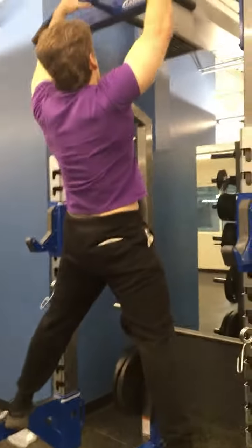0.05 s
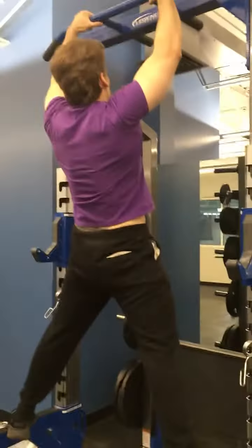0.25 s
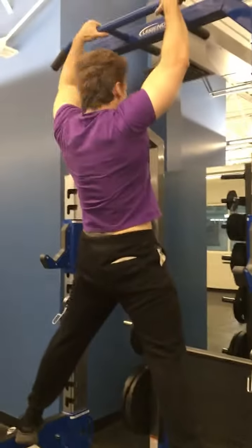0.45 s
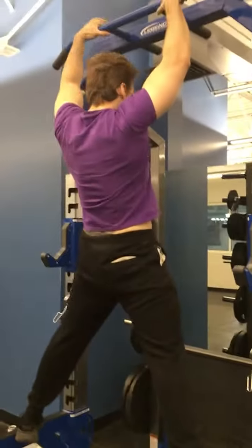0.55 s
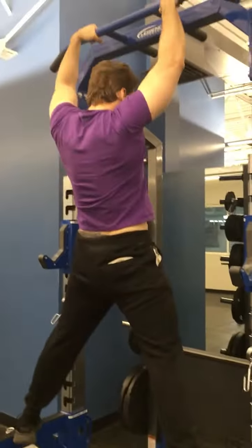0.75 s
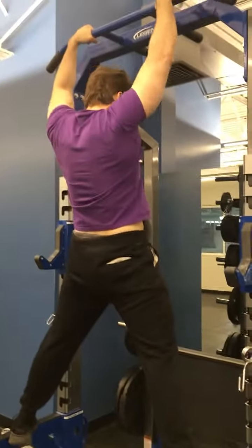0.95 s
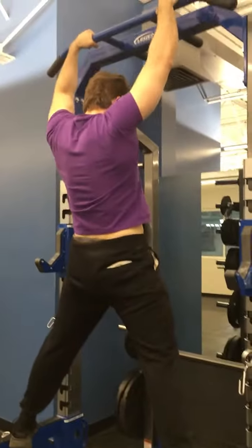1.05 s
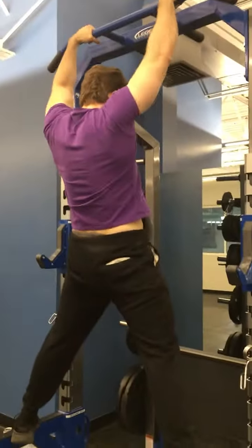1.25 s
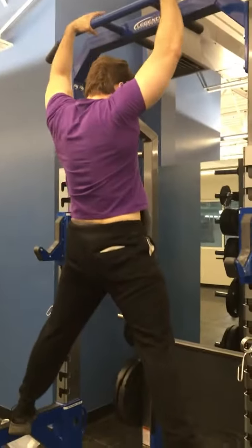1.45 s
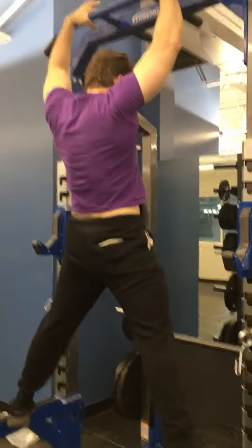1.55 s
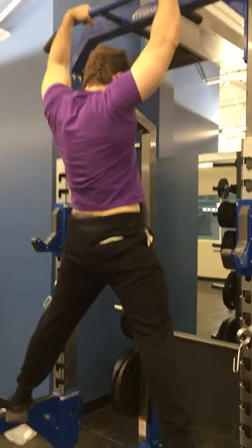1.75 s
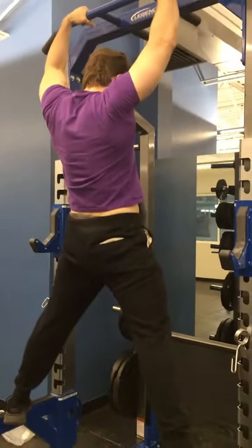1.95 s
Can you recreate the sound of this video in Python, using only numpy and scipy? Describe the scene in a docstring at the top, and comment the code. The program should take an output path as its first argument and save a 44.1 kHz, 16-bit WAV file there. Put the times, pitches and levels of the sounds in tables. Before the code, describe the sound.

Steel gym equipment lands with a loud, ringing clank, followed by light metal clicks.

```python
"""A distant clank dies away in a large, hard room, then steel gym equipment lands with a loud rattle.
The steel chatters in a burst of contacts and leaves its frame ringing; a duller knock comes from afar.
Small steel fittings tick, ting and click, followed by a soft bump and a faint ping.
The hall answers the contacts, and under it all the ventilation rumbles, hisses and hums."""
import sys
import numpy as np
from scipy import signal
from scipy.fft import rfft, irfft, next_fast_len
from scipy.io import wavfile
from scipy.ndimage import map_coordinates

SR = 44100
rng = np.random.default_rng(int(sys.argv[2]) if len(sys.argv) > 2 else 0)


def transcribe(signal):
    """Save signal, clipped to [-1, 1], as a 16-bit WAV file at the path in sys.argv[1]."""
    frames = np.atleast_2d(signal).T
    limited = np.clip(frames, -1, 1)
    pcm = np.round(limited * 32767).astype(np.int16)
    wavfile.write(sys.argv[1], SR, pcm)


N = 88200
TIME = np.arange(N) / SR

CLANK_HITS = [(0.2354, -53, 6), (.247, -19.5, -2), (0.2534, -16.5, 3.5), (0.2651, -16.5, 1.4),
              (0.2767, -25.5, -1), (.288, -20.5, 1)]  # the burst of contacts: t/s, level/dB, treble tilt/(dB per octave)
CLANK_COLOUR = [(90, -8), (150, -2), (265, -4), (460, -10.5), (680, -1.5), (780, -7), (1150, -2),
                (1300, 1.5), (1700, 6), (2000, -0.5), (2300, 0.5), (2680, -1.5), (2850, -4.5), (3300, -1),
                (3950, -7), (4620, -6.5), (4950, -9), (6400, -7.5), (7500, -10), (10500, -15),
                (12700, -10.5), (15500, -15.5)]  # tone of each contact: f/Hz, relative level/dB
FRAME_HITS = [(0.2353, -30), (0.2469, -12.5)]  # a first touch, then the full blow: t/s, level/dB
FRAME_RING = [(259.7, -14.5, 0.54), (559, -22.5, 0.58), (683, -19, 0.51), (904, -15, 0.59),
              (1164, -3, 0.46), (1416, -17.5, 0.3), (1516, -16, 0.24), (1688, 2, 0.67), (1706, -4, 0.98),
              (1780, -12, 0.81), (1895, -12.5, .7), (2220, -13, 0.83), (2626, -5, 0.43), (2723, -11, 0.56),
              (3093, -17, 0.74), (3273, -16.5, 0.72), (3397, -18, 0.86), (4580, -15.5, 0.58),
              (6360, -20, 0.52)]  # modes of the steel frame: f/Hz, relative level/dB, t60/s
def clank(settle_s=0.292, settle_over_s=0.0085, damping_db=-5):
    """Heavy steel lands, chatters for 50 ms and rings the frame, damping it as it comes to rest."""
    chatter, frame = np.zeros(N), np.zeros(N)
    for s, db, tilt_db in CLANK_HITS:
        hit = contact(CLANK_COLOUR, t60=0.17, hall_db=-6.5, build_s=0.0091, tilt_db=tilt_db)
        add(chatter, s, amp(db) * hit)
    for s, db in FRAME_HITS:
        add(frame, s, amp(db) * ring(FRAME_RING, attack_s=0.0015, flutter_depth=0.4, flutter_hz=51.2))
    settled = np.clip((TIME - settle_s) / settle_over_s, 0, 1)
    return chatter + frame * amp(damping_db * settled)


FAR_CLANK_COLOUR = [(100, -12), (300, -13), (550, -14), (900, -3), (1050, -9), (1700, 3), (2150, 2),
                    (2500, -4), (2700, 3.5), (2900, -7.5), (3450, 5.5), (3650, -5), (4200, -7.5), (4550, 1),
                    (4800, -9), (6100, -5), (7100, -12.5), (8600, -14), (10200, -22), (12700, -23),
                    (15500, -29)]  # tone of the opening clank: f/Hz, relative level/dB
KNOCK_HITS = [(0.4868, -24.5)]  # the duller knock: t/s, level/dB
KNOCK_COLOUR = [(150, 2.5), (340, -4), (500, -10.5), (900, -5), (1100, -7), (2200, 3), (2850, -7),
                (3400, 0.5), (3750, -6.5), (4150, -1), (4650, -8.5), (5300, -4), (5850, 1.5), (6600, -10.5),
                (7500, -6.5), (8200, -11), (9500, -15), (12600, -16.5), (15500, -12)]  # tone of its attack: f/Hz, relative level/dB
KNOCK_RING = [(1690, -11.5, 0.89), (2164, -17, .8), (3090, -18.5, 0.98), (3450, -16.5, 0.89),
              (5600, -23, 0.88), (6200, -14, 0.56)]  # its steel ring: f/Hz, relative level/dB, t60/s
def distant_blows():
    """A clank already fading at the start and a ringing knock, both heard mostly through the hall."""
    out = np.zeros(N)
    add(out, -0.043, amp(-26.5) * contact(FAR_CLANK_COLOUR, t60=0.056, hall_db=-1.5, build_s=0.008))
    for s, db in KNOCK_HITS:
        blow = contact(KNOCK_COLOUR, t60=0.17, hall_db=1, build_s=0.015)
        ringing = ring(KNOCK_RING, attack_s=0.004, flutter_depth=0.35, flutter_hz=50.5)
        add(out, s, amp(db) * (blow + ringing))
    return out


TING_HITS = [(0.171, -65, 0), (.943, -60, -9), (.963, -55.5, -9), (1.02, -47.5, 5.5), (1.03, -36, -1.5)]  # brushes, then strikes: t/s, level/dB, ring trim/dB
TING_COLOUR = [(1500, -24), (3000, -23.5), (5000, -19), (6400, -13), (7800, -21), (10200, -18),
               (11500, -10), (12100, -5), (12700, 5.5), (13500, -9), (15500, -13)]  # tone of each touch: f/Hz, relative level/dB
TING_RING = [(2870, -19, .45, 70), (4301, -15, .5, 170), (6240, -11, .55, 260), (7050, -18, .5, 170),
             (8511, -14, .45, 100), (10840, -3, .38, 210), (12580, -3, .28, 320), (12830, 3.5, .33, 140),
             (12950, -3, .33, 140)]  # bright mode clusters: f/Hz, relative level/dB, t60/s, width/Hz
def ting():
    """A small steel fitting is brushed, then struck, and shimmers high up."""
    out = np.zeros(N)
    for s, db, ring_db in TING_HITS:
        touch = amp(-2) * contact(TING_COLOUR, t60=0.1, hall_db=0.5, build_s=0.014)
        shimmer = amp(ring_db) * cluster(TING_RING, attack_s=0.0014)
        add(out, s, amp(db) * (touch + shimmer))
    return out


CLICK_HITS = [(1.311, -38), (1.3235, -39.5)]  # the click and its bounce: t/s, level/dB
CLICK_COLOUR = [(300, -3), (700, -1), (1500, 3), (2200, 2.5), (3000, -0.5), (5400, -6), (6300, -0.5),
                (9000, -4.5), (11500, 2.5), (13500, 4), (15500, -0.5)]  # tone of the snap: f/Hz, relative level/dB
CLICK_RING = [(2150, -7, 0.64, 280), (2725, -7.5, .2, 840), (3250, -13.5, .4, 300),
              (7574, -13.5, 0.58, 420), (11200, -8.5, 0.4, 160), (11740, -9, 0.24, 150),
              (12350, -14, 0.38, 180), (14500, -4, .22, 200), (14400, 2, .07, 350)]  # the part's mode clusters: f/Hz, relative level/dB, t60/s, width/Hz
def click():
    """A latch-like part snaps, bounces once and rings briefly."""
    out = np.zeros(N)
    for s, db in CLICK_HITS:
        snap = contact(CLICK_COLOUR, t60=0.15, hall_db=-4, build_s=0.0038)
        add(out, s, amp(db) * (snap + cluster(CLICK_RING, attack_s=0.00066)))
    return out


TICK_HITS = [(0.695, -38.5), (.722, -52), (1.812, -64)]  # light touches: t/s, level/dB
TICK_COLOUR = [(2000, -35), (8000, -6.5), (10500, 2), (13000, 9), (15500, -1.5)]  # their thin, treble tone: f/Hz, relative level/dB
def ticks():
    """Small steel parts touch too lightly to ring."""
    out = np.zeros(N)
    for s, db in TICK_HITS:
        add(out, s, amp(db) * contact(TICK_COLOUR, t60=0.04, hall_db=-1, build_s=0.009))
    return out


BUMP_HITS = [(1.47, -37.5)]  # the bump: t/s, level/dB
BUMP_COLOUR = [(40, -22), (110, 5.5), (200, -3.5), (330, -14.5), (500, -32), (3000, -49), (4600, -30.5),
               (6000, -39), (10000, -64)]  # its bass-heavy tone: f/Hz, relative level/dB
def bump():
    """A soft, low contact blooms in the hall."""
    out = np.zeros(N)
    for s, db in BUMP_HITS:
        add(out, s, amp(db) * contact(BUMP_COLOUR, t60=0.12, hall_db=-1, build_s=0.0076))
    return out


PING_HITS = [(1.823, -59)]  # the faint ping: t/s, level/dB
PING_RING = [(3560, 2.5, .45, 200)]  # its one mode cluster: f/Hz, relative level/dB, t60/s, width/Hz
def ping():
    """A far-off fitting rings in one narrow band."""
    out = np.zeros(N)
    for s, db in PING_HITS:
        add(out, s, amp(db) * cluster(PING_RING, attack_s=0.0012))
    return out


HUM_FADER = [(0, -47), (.15, -38), (.5, -40), (.65, -34.5), (.94, -31.5), (1.05, -34.5), (1.36, -34),
             (1.45, -38.5), (1.7, -47), (1.8, -37), (2, -35)]  # swells of the hum: t/s, level/dB
RUMBLE_COLOUR = [(20, -22), (32, -15.5), (45, -3), (60, -8), (80, -5), (105, 2.5), (135, -7.5), (175, -5.5),
                 (215, -17.5), (320, -18.5), (450, -38), (700, -56)]  # low end of the moving air: f/Hz, relative level/dB
HISS_COLOUR = [(200, 7), (450, -1), (700, 2), (1300, -4), (2300, -5.5), (3500, -14), (5500, -21.5),
               (10000, -28), (13000, -24), (15500, -28)]  # its soft hiss: f/Hz, relative level/dB
def ventilation(hum_hz=58.7, rumble_db=-37.5, hiss_db=-53.5):
    """A bed of air rumble and hiss, with a low hum that wavers in level and pitch."""
    hum_rms = amp(np.interp(TIME, *np.transpose(HUM_FADER)))
    hum = hum_rms * np.sqrt(2) * np.sin(2 * np.pi * hum_hz * TIME + 0.48 * wobble(7.65))
    return hum + amp(rumble_db) * noise(RUMBLE_COLOUR) + amp(hiss_db) * noise(HISS_COLOUR)


HALL_DECAY = [(200, 0.97), (900, 0.51), (2200, 0.86), (5500, 0.7), (8500, 0.56), (12000, 0.34),
              (15500, 0.32)]  # reverb time of the room: f/Hz, t60/s
def contact(colour, t60, hall_db, build_s, tilt_db=0):
    """One hit: a noise burst stands for dense, fast-dying modes, and the hall's tail builds behind it."""
    hz, when, bands = signal.stft(noise(colour, tilt_db), SR, nperseg=256)
    band_decay = fade(when, along(HALL_DECAY, hz)[:, None])
    tail = signal.istft(bands * band_decay, SR, nperseg=256)[1][:N]
    direct = noise(colour, tilt_db) * fade(TIME, t60)
    return direct + amp(hall_db) * tail * rise(build_s)


def ring(modes, attack_s, flutter_depth, flutter_hz):
    """Partials start together, so close pairs beat; later, reflections make each one flutter."""
    out = np.zeros(N)
    depth = flutter_depth * rise(0.012)  # the reflections build up
    for hz, db, t60 in modes:
        flutter = 1 + depth * (wobble(flutter_hz) + 1j * wobble(flutter_hz))
        out += amp(db) * fade(TIME, t60) * np.imag(flutter * np.exp(2j * np.pi * hz * TIME))
    return out * rise(attack_s) / np.sqrt(1 + 2 * depth ** 2)


def cluster(modes, attack_s):
    """Groups of close modes that beat roughly as they decay."""
    out = np.zeros(N)
    for hz, db, t60, width_hz in modes:
        beating = (wobble(width_hz) + 1j * wobble(width_hz)) / np.sqrt(2)
        out += amp(db) * fade(TIME, t60) * np.real(beating * np.exp(2j * np.pi * hz * TIME))
    return out * rise(attack_s)


def noise(colour, tilt_db=0):
    """Coloured noise of rms 1, tilted in dB per octave."""
    def response(hz):
        return amp(along(colour, hz) + tilt_db * np.log2(hz / SR + 1e-3))
    x = filtered(rng.standard_normal(N), response)
    return x / np.sqrt(np.mean(x ** 2) + 1e-20)


def filtered(x, response):
    """x through an EQ curve, given as gain against frequency."""
    size = next_fast_len(N + SR // 2)
    return irfft(rfft(x, size) * response(np.fft.rfftfreq(size, 1 / SR)), size)[:N]


def along(points, hz):
    """A curve of (f/Hz, value) points, read on a log axis."""
    freqs, values = np.transpose(points)
    return np.interp(np.log(hz + 1), np.log(freqs + 1), values)


def wobble(rate):
    """Smooth random modulation, rate knots a second."""
    return map_coordinates(rng.standard_normal(1024), [TIME * rate], mode="wrap")


def rise(tau_s):
    """Attack envelope with time constant tau_s."""
    return 1 - np.exp(-TIME / tau_s)


def fade(t, t60):
    """Free decay, 60 dB in t60."""
    return np.exp(-np.log(1000) * t / t60)


def amp(db):
    """Decibels to gain."""
    return 10 ** (np.asarray(db) / 20)


def add(out, s, x):
    """Mix x into out from time s on; a negative s cuts off its head."""
    start = round(s * SR)
    part = x[max(-start, 0):N - max(start, 0)]
    out[max(start, 0):][:len(part)] += part


def scene():
    """The mono mix at one microphone."""
    return (clank() + distant_blows() + ting() + click() + ticks() + bump() + ping() + ventilation())[None]


def record(dry, ceiling=0.8, top_hz=15800):
    """A soft clip rounds the highest peaks, then a brick-wall low-pass trims the top."""
    soft = dry[0] / (1 + np.abs(dry[0] / ceiling) ** 6) ** (1 / 6)
    return filtered(soft, lambda hz: hz < top_hz)[None]


dry = scene()
out = record(dry)
transcribe(out)
```